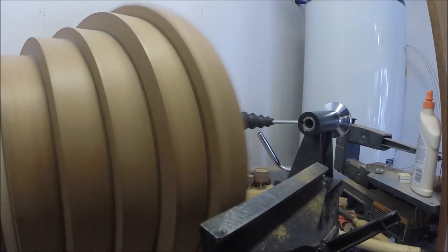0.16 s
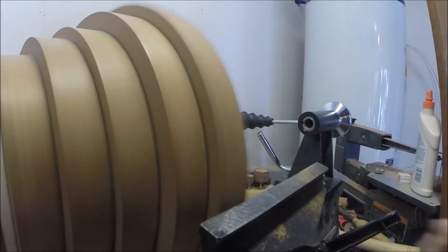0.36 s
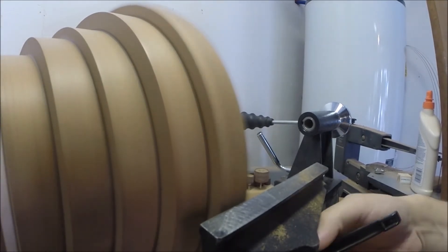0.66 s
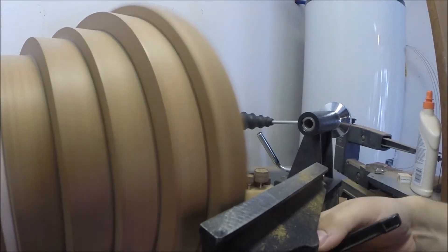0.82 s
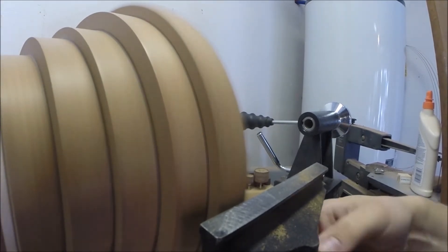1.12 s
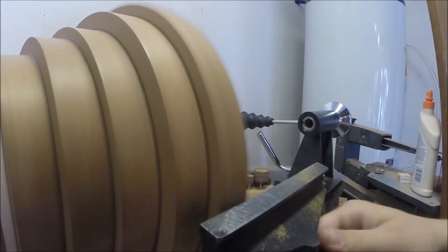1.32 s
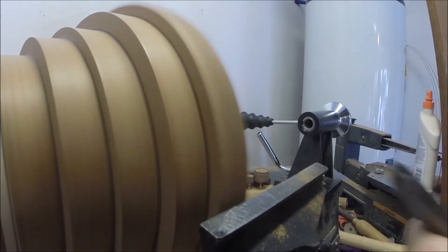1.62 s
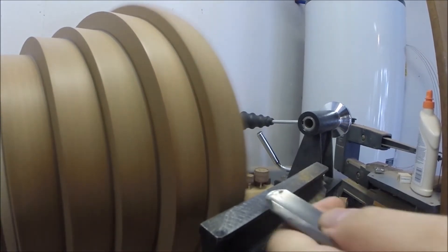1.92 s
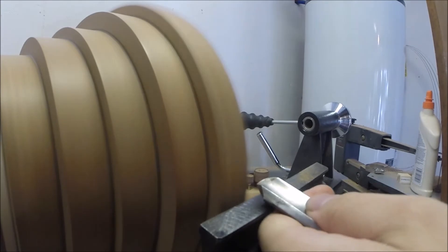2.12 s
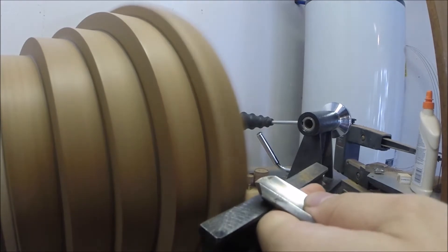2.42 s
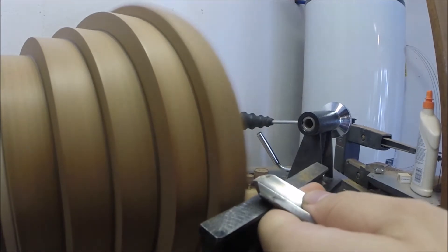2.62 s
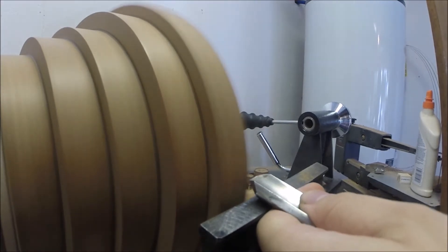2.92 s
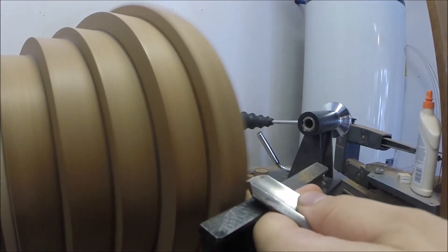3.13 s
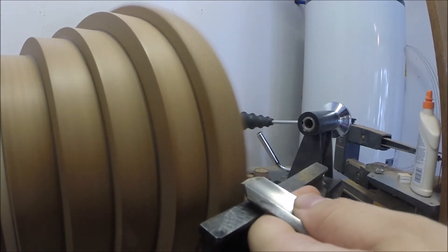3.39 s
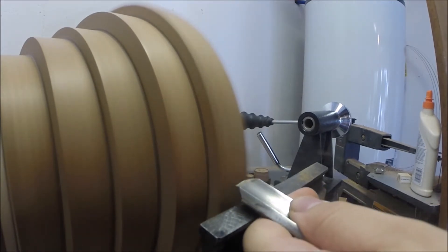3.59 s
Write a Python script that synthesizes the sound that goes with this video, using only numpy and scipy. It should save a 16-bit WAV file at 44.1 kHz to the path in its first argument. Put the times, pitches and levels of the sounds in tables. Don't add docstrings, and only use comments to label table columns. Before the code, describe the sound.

A wood lathe starts with a short electrical buzz and shudder, its hum rising to a steady, slightly beating low drone by about 0.6 s, with soft bearing whirr. Faint metal ticks come at 0.8 and 1.2 s, a sharp steel clack at 1.3, another light tick near 2.25. From 2.8 s the tool cuts: harsh, rapid rattling scrape with crackling chips until the end, close in a small workshop.

```python
import sys
import numpy as np
from scipy import signal
from scipy.fft import rfft, irfft
from scipy.io import wavfile
from scipy.ndimage import uniform_filter1d

SR = 44100
rng = np.random.default_rng(int(sys.argv[2]) if len(sys.argv) > 2 else 0)


def wrap_up_sound(samples):
    columns = np.atleast_2d(samples).T
    tamed = np.clip(columns, -1, 1)
    steps = np.round(tamed * 32767).astype(np.int16)
    wavfile.write(sys.argv[1], SR, steps)


def amplitude_ratio(level_db):
    exponent = np.asarray(level_db, float) / 20
    return 10 ** exponent


N = 165375

MOTOR_HZ, LOADED_HZ, BELT_RATIO, BELT_SLIP_HZ = 29.728, 29.603, 0.9685, 0.012
MAINS_LINE_HZ = 120.1
LOAD_S, LOAD_RISE_S = 2.9, 0.19
LINE_WANDER_DB = 3

# (time [s], missing motor speed [Hz], pole hum [dB])
SPIN_UP = [(0, 10.5, -47), (.1, 8.5, -30), (.2, 6, -23.5), (.3, 4.5, -16), (0.399, 1.93, -15.5),
           (.5, .5, -16), (.6, 0.62, -19), (0.802, 0, -16.5)]
# (multiple of turn [1], level while bench shudders [dB], steady level [dB])
MOTOR_OVERTONES = [(2, -58.5, -52.5), (5, -28, -60.5), (6, -35.5, -62), (7, -44, -58.5), (8, -44, -47),
                   (9, -44, -59), (10, -46.5, -58.5)]
# (multiple of turn [1], idle level [dB], cutting level [dB], offset [turns])
SPINDLE_SHAKE = [(1, -38.5, -40, 0.083), (2, -43.5, -48, 0.077), (3, -43.5, -32.5, .42),
                 (4, -45, -23.5, 0.28), (5, -49, -50.5, 0.84), (6, -54, -48.5, 0.19)]
# (multiple of mains line [1], spindle turns added [1], level [dB], offset [turns])
MAINS_LINES = [(1, 0, -34.5, 0.35), (1, -2, -50, 0.083), (1, -1, -51.5, 0.32), (1, 1, -46.5, .4),
               (1, 2, -48.5, .2), (2, -1, -50.5, .8), (2, 0, -51.5, .5), (2, 1, -50, 0.15),
               (2, 2, -49.5, 0.64), (3, 0.16, -64, .2), (4, 0, -71, 0.81), (5, 0, -62, .7)]
# (centre [Hz], width [Hz], level [dB])
START_BUZZ = [(583, 48, 3.5), (794, 45, -2), (1055, 140, -7.5), (1450, 66, -6)]
# (frequency [Hz], density [dB])
RUMBLE_SPECTRUM = [(8, -19), (20, -7.5), (65, -9.5), (110, 1), (200, -4), (290, -10.5), (340, -16.5),
                   (450, -30.5)]
# (frequency [Hz], density [dB])
WHIRR_SPECTRUM = [(250, -49.5), (420, -12), (467, -1.5), (702, -7), (921, -3.5), (1190, -16), (2280, -13),
                  (11500, -38), (15500, -46)]
# (frequency [Hz], level [dB])
BEARING_WHINES = [(896, -60), (1017, -65), (2290, -69)]
# (time [s], level [dB], ring [Hz], t60 [s])
TOUCHES = [
    (.829, -50, 2310, .03),
    (1.238, -44, 1740, .05),
    (2.2474, -48.5, 4410, .07),
    (2.2475, -52, 6200, .03),
    (2.267, -47, 3300, .03),
]
# (frequency [Hz], level [dB], t60 [s])
TAP_MODES = [(1733, -23.5, 0.27), (2778, -19.5, 0.073), (3210, -25, 0.65), (3300, -9, 0.43),
             (3730, -3.5, 0.12), (3870, -10.5, 0.15), (4140, -0.5, 0.076), (4770, 5, 0.096),
             (6228, -9, 0.16), (9260, -29, 0.11), (10840, -30, 0.13)]
# (time [s], level [dB], centre [Hz], fade [s])
CHIP_CRACKS = [
    (2.77, -40.5, 5430, 0.0085),
    (2.958, -47.5, 8560, .005),
    (2.982, -31.5, 11050, .004),
    (3.116, -39, 10000, 0.0043),
    (3.285, -39.5, 14180, 0.0021),
]
# (time [s], force [dB], drop-out of low segments [1])
CUT = [(2.795, -65, 3.8), (2.8, -27.5, 4), (2.9, -29.5, 2.8), (2.95, -31, 1.4), (3.02, -26, 1),
       (3.15, -25.5, 1.1), (3.35, -25.5, 0.97), (3.45, -27, 0.79), (3.55, -22.5, 1.3), (3.75, -26, 0.92)]
JOINT_HEIGHT_DB = [-8, -4, 0, -2, -4, -3, -1, -5, -6, -5, -10, -8]
# (centre [Hz], width [Hz], level [dB])
TOOL_MODES = [(1054, 19, -15), (1500, 50, -12.5), (2103, 22, -14.5), (2782, 26, -6.5), (3153, 23, -14),
              (3477, 63, -0.5), (4045, 41, -13.5), (4380, 25, -3.5), (4856, 25, -9), (5190, 16, -16.5),
              (5450, 20, -11), (5858, 38, -3.5), (6100, 60, -3), (7800, 27, -35)]
# (frequency [Hz], density [dB])
CHIP_SPECTRUM = [(300, -5), (1200, -25), (1500, -9.5), (3500, 1), (6300, -12.5), (6800, -32.5),
                 (11000, -69), (15300, -47)]
# (multiple of joint rate [1], level [dB])
BLANK_DRUM = [(1, -51), (2, -52), (3, -57)]
# (time [s], length [s], floor below strongest line [dB])
THIN_MOMENTS = [
    (2.974, .012, -16),
    (3.08, .011, -17),
    (3.186, .06, -10),
    (3.357, .011, -18),
]


def level(x, db):
    return x * amplitude_ratio(db) / np.sqrt(np.mean(x ** 2))


def colour(x, spectrum):
    hz, db = np.array(spectrum).T
    f = np.arange(N // 2 + 1) * SR / N + 1e-3
    gain = amplitude_ratio(np.interp(np.log(f), np.log(hz), db, left=-90, right=-90))
    return irfft(rfft(x) * gain, N)


def ring(x, hz, width_hz):
    return signal.lfilter(*signal.iirpeak(hz, hz / width_hz, fs=SR), x)


def walk(rate_hz):
    k = int(SR / rate_hz)
    steps = np.repeat(rng.standard_normal(N // k + 1), k)
    return 1.47 * uniform_filter1d(uniform_filter1d(steps, k), k)[:N]


def turning_noise(turns, repeat):
    track = rng.standard_normal(1536)
    again = np.interp(turns % 1 * len(track), np.arange(len(track)), track)
    fresh = rng.standard_normal(N)
    return np.sqrt(repeat) * again / again.std() + np.sqrt(1 - repeat) * fresh


def tone(turns, db):
    return np.sqrt(2) * amplitude_ratio(db) * np.cos(2 * np.pi * turns)


def decay(age_s, t60_s):
    return np.exp(-np.log(1000) * age_s / t60_s)


def spun_up(t):
    return np.clip((t - 0.2) / 0.65, 0, 1)


def mains_hum(t, spindle, start):
    out = np.zeros(N)
    for multiple, added, db, offset in MAINS_LINES:
        if multiple == 1 and added == 0:
            line_db = db + 7 * start
        else:
            line_db = db + LINE_WANDER_DB * walk(14)
        line = tone(multiple * MAINS_LINE_HZ * (t - LOAD_S) + added * spindle + offset, line_db)
        out = out + line * (spun_up(t) if added else 1)
    return out


def motor_hum(t, motor, load):
    time_s, _, pole_db = np.array(SPIN_UP).T
    out = tone(4 * motor + 0.05, np.interp(t, time_s, pole_db) - 2 * load + 0.4 * walk(6.09))
    shudder = np.exp(-((t - 0.33) / 0.13) ** 2)
    for multiple, shudder_db, steady_db in MOTOR_OVERTONES:
        out = out + tone(multiple * motor, steady_db + LINE_WANDER_DB * walk(14)) * spun_up(t)
        out = out + tone(multiple * motor, shudder_db) * shudder
    return out


def start_buzz(t, start):
    grit = rng.standard_normal(N) * amplitude_ratio(9.4 * np.cos(2 * np.pi * MAINS_LINE_HZ * t) + 1.5 * walk(40))
    buzz = sum(amplitude_ratio(db) * ring(ring(grit, hz, 2 * width), hz, 2 * width) for hz, width, db in START_BUZZ)
    return level(buzz, -43) * start * amplitude_ratio(-20 * t)


def bench_rumble(start):
    rumble = level(colour(rng.standard_normal(N), RUMBLE_SPECTRUM), -36)
    return rumble * amplitude_ratio(0.72 * walk(9.8) - 4.6 * start)


def bearing_whirr(t, motor, start):
    throb = amplitude_ratio(0.5 * np.cos(2 * np.pi * 4 * motor) + 1.0 * walk(13))
    whirr = level(colour(turning_noise(motor, 0.32) * throb, WHIRR_SPECTRUM), -50)
    whines = sum(tone(hz * t, db + 3 * walk(12)) for hz, db in BEARING_WHINES)
    return (whirr + whines) * amplitude_ratio(-1.5 * start)


def spindle_shake(t, spindle, load):
    out = np.zeros(N)
    for multiple, idle_db, cutting_db, offset in SPINDLE_SHAKE:
        wander_db = min(multiple - 1, 1) * (2.5 - 1.5 * load) * walk(9)
        out = out + tone(multiple * spindle + offset, idle_db + (cutting_db - idle_db) * load + wander_db)
    return out * spun_up(t)


def light_touches(t):
    out = np.zeros(N)
    for time_s, db, hz, t60_s in TOUCHES:
        age_s = np.maximum(t - time_s, 0)
        out = out + amplitude_ratio(db) * decay(age_s, t60_s) * np.sin(2 * np.pi * hz * age_s)
    return out


def tool_tap(t):
    age_s = np.maximum(t - 1.3309, 0)
    modes = np.zeros(N)
    for hz, db, t60_s in TAP_MODES:
        modes = modes + amplitude_ratio(db) * decay(age_s, 0.5 * min(t60_s, 0.15)) * np.sin(2 * np.pi * hz * age_s)
    modes = 0.25 * (1 - np.exp(-age_s / 0.00054)) * modes
    crack_fade = np.exp(-age_s / 0.0047) + 0.11 * np.exp(-age_s / 0.026)
    crack_rise = 1 - np.exp(-age_s / 0.0012)
    crack = ring(rng.standard_normal(N), 3400, 3500) * crack_fade * crack_rise
    return amplitude_ratio(-12.5) * (modes + amplitude_ratio(-1.5) * 0.47 * crack)


def chip_cracks(t):
    out = np.zeros(N)
    for time_s, db, hz, fade_s in CHIP_CRACKS:
        fade = np.exp(-np.maximum(t - time_s, 0) / fade_s) * (t > time_s)
        out = out + amplitude_ratio(db) * ring(rng.standard_normal(N), hz, 0.7 * hz) * fade
    return out


def joint_cutting(t, spindle):
    time_s, force_db, drop = np.array(CUT).T
    force_db, drop = np.interp(t, time_s, force_db), np.interp(t, time_s, drop)
    touching = t > time_s[0]
    count = len(JOINT_HEIGHT_DB)
    place = count * spindle - 0.3
    joint = np.floor(place).astype(int)
    passing = joint - joint.min()
    scatter, jitter = rng.standard_normal((passing.max() + 1, 2))[passing].T
    height_db = np.array(JOINT_HEIGHT_DB)[joint % count]
    gain = amplitude_ratio(force_db + drop * height_db + 2 * scatter) * touching

    misfit = rng.standard_normal(count)[joint % count]
    late_s = 1.2e-5 * misfit + 1.6e-5 * jitter
    since = (place - joint - 0.06) / np.gradient(place) - late_s * SR
    knock = gain * level(np.sinc(since) * (abs(since) < 6), -4)
    scrape = turning_noise(spindle, 0.55) * (0.45 + np.exp(-(place - joint) / 0.4))
    scrape = gain * level(scrape, -3)

    steel = np.zeros(N)
    for hz, width_hz, db in TOOL_MODES:
        damped_hz = 1.5 * width_hz
        steel = steel + amplitude_ratio(db + 2.5 * walk(20)) * ring(knock + scrape, hz, damped_hz)
    chips = amplitude_ratio(-7) * 3 * colour(0.3 * knock + scrape, CHIP_SPECTRUM) * touching
    return 10 * steel + chips


def blank_drum(t, spindle):
    joints = len(JOINT_HEIGHT_DB) * spindle
    drum = sum(tone(multiple * joints, db + 4 * walk(30)) for multiple, db in BLANK_DRUM)
    return np.clip((t - 2.95) / 0.06, 0, 1) * drum


def room_tail(t, hard):
    t = t[:SR // 2]
    tail = rng.standard_normal(SR // 2) * decay(t, 0.16) * (t > 0.004)
    return signal.fftconvolve(hard, tail / np.sqrt(np.sum(tail ** 2)))[:N] * amplitude_ratio(-10.5)


def scene():
    t = np.arange(N) / SR
    load = np.clip((t - LOAD_S) / LOAD_RISE_S, 0, 1)
    start = np.clip((0.25 - t) / 0.1 + 1, 0, 1)
    time_s, missing_hz, _ = np.array(SPIN_UP).T
    speed_hz = np.where(t < LOAD_S, MOTOR_HZ, LOADED_HZ) - np.interp(t, time_s, missing_hz)
    motor = np.cumsum(speed_hz) / SR
    motor = motor - motor[int(LOAD_S * SR)]
    spindle = BELT_RATIO * motor - BELT_SLIP_HZ * np.maximum(t - LOAD_S, 0)

    hums = mains_hum(t, spindle, start) + motor_hum(t, motor, load) + spindle_shake(t, spindle, load)
    noises = start_buzz(t, start) + bench_rumble(start) + bearing_whirr(t, motor, start)
    hard = light_touches(t) + tool_tap(t)
    hard = hard + chip_cracks(t) + joint_cutting(t, spindle) + blank_drum(t, spindle)
    return (hums + noises + hard + room_tail(t, hard))[None]


def roll_off(x):
    return signal.sosfilt(signal.butter(12, 15700, fs=SR, output="sos"), x)


def record(dry):
    t = np.arange(N) / SR
    f = np.arange(N // 2 + 1) * SR / N
    high = irfft(rfft(dry[0]) * (f > 420), N)
    out = dry
    for time_s, length_s, keep_db in THIN_MOMENTS:
        moment = np.clip(4 * (1 - abs(t - time_s) / (length_s / 2)), 0, 1)
        part = rfft(high * moment)
        heard = abs(part) / (f + 300) ** 0.45
        weak = heard < amplitude_ratio(keep_db) * heard.max()
        out = out - irfft(part * weak, N) * (moment > 0)
    lowpass = signal.ellip(8, 0.2, 50, 15600, fs=SR, output="sos")
    out = signal.sosfilt(lowpass, out) * np.clip(t / 0.006, 0, 1)
    return roll_off(out)


dry = scene()
out = record(dry)
wrap_up_sound(out)
```